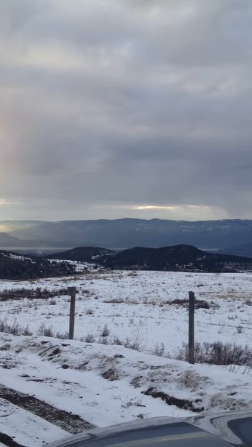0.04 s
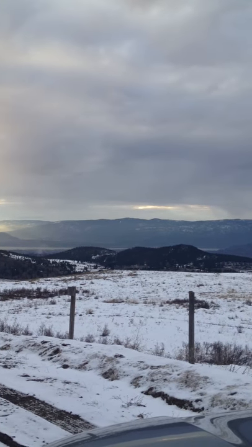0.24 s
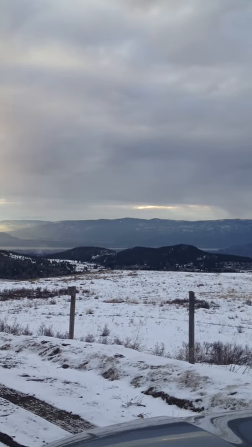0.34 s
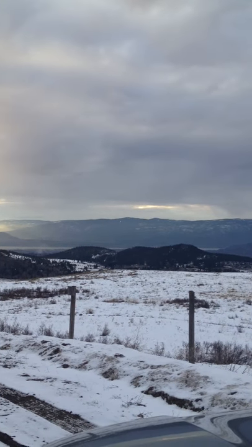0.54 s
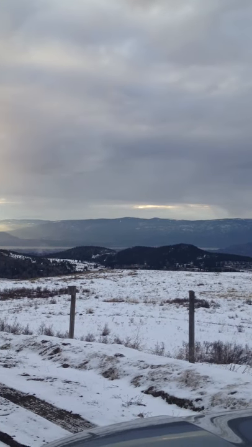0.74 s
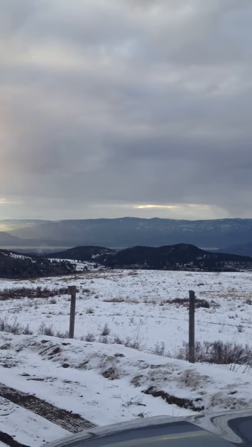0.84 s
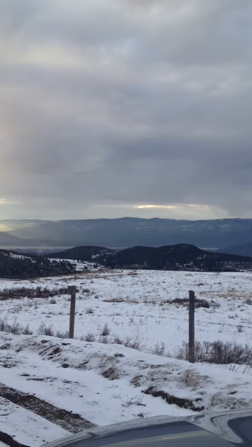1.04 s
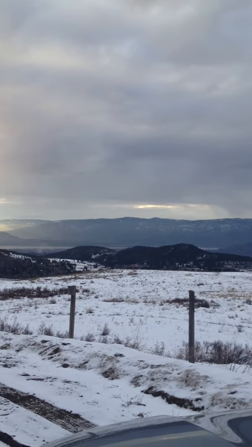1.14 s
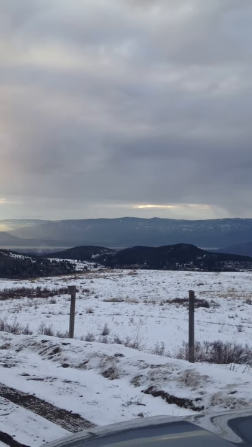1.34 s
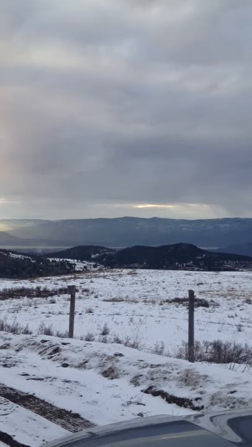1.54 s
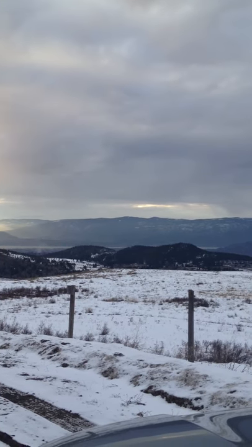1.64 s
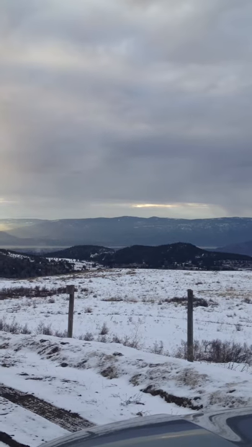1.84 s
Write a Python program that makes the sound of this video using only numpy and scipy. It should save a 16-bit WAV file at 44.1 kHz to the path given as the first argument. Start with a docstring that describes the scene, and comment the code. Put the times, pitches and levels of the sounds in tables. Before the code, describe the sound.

One coyote howl dips and rises, followed by a brief raspy bark in an open field.

```python
"""An open snowy field, where a coyote calls over a quiet hush: a raspy start, a held howl that keeps
breaking into the octave below, a swoop down and up, then one short hoarse bark. Periodic vibration
of the vocal folds gives the howl its harmonics, and period doubling adds half-pitch tones between
them. The hoarse sounds are turbulence ringing the mouth. Brush and a slope return a faint echo."""
import sys
import numpy as np
from scipy import signal
from scipy.fft import rfft, irfft
from scipy.io import wavfile
from scipy.ndimage import uniform_filter1d

SR = 44100
rng = np.random.default_rng(int(sys.argv[2]) if len(sys.argv) > 2 else 0)


def generate_wav(signal):
    """Clip the signal to [-1, 1] and save it as 16-bit WAV at the path in sys.argv[1]."""
    frames = np.transpose(np.atleast_2d(signal))
    scaled = np.clip(frames, -1, 1) * 32767
    pcm = np.round(scaled).astype(np.int16)
    wavfile.write(sys.argv[1], SR, pcm)


N = 83790
T = np.arange(N) / SR

# Response of the throat to turbulent breath. Each row: frequency in Hz, gain in dB.
BREATH_RESPONSE = [(250,-27),(450,-19.5),(560,2.5),(800,-2.5),(1000,-6.5),(1250,0.5),(1500,0),(1680,-5.5),(1900,1.5),(2150,-7.5),(2400,-19),(2800,-24),(4000,-44),(7000,-47.5)]


def from_db(db):
    """Amplitude ratio for a level in decibels."""
    return 10 ** (np.asarray(db) / 20)


def rms_one(x):
    """The signal scaled to rms 1."""
    return x / np.sqrt(np.mean(x ** 2) + 1e-20)


def envelope(rows):
    """Amplitude along a curve of level against time, silent outside it."""
    return from_db(np.interp(T, *np.transpose(rows), left=-140, right=-140))


def db_at(response, hz):
    """Gain of a frequency response in dB, interpolated over log frequency."""
    frequencies, gains_db = np.transpose(response)
    return np.interp(np.log(hz + 1), np.log(frequencies), gains_db)


def coloured_noise(spectrum):
    """White noise filtered to the shape of a spectrum; rms 1."""
    gain = from_db(db_at(spectrum, np.fft.rfftfreq(N, 1 / SR)))
    return rms_one(irfft(rfft(rng.standard_normal(N)) * gain, N))


def drift(corner_hz):
    """Smooth random fluctuation: noise through a two-pole low-pass; rms 1."""
    pole = np.exp(-2 * np.pi * corner_hz / SR)
    return rms_one(signal.lfilter([1], [1, -2 * pole, pole * pole], rng.standard_normal(2 * N))[N:])


def evened(noise):
    """Noise divided by its running rms, which removes slow swings of level."""
    return noise / np.sqrt(uniform_filter1d(noise ** 2, size=300))


def tone(phase):
    """A sinusoid of rms 1 with a random starting phase."""
    return np.sqrt(2) * np.sin(phase + 2 * np.pi * rng.random())


def hush():
    """Stationary broadband noise: still air and a faint hiss."""
    # Spectrum of the hush. Each row: frequency in Hz, relative density in dB.
    spectrum = [(30,-44),(75,-31),(100,-25),(125,-12.5),(190,-4),(300,-5),(480,-9),(600,-11.5),(830,-10),(1120,-19),(1500,-23),(2500,-24),(6000,-25.5),(8000,-27),(10200,-33.5),(12500,-26),(15200,-26)]
    return from_db(-67) * coloured_noise(spectrum)


def wash(start_db=-75, t60_s=1.3):
    """Exponential decay: a faint band of noise dies away at the opening."""
    # Spectrum of the wash. Each row: frequency in Hz, relative density in dB.
    spectrum = [(250,-27),(450,0),(900,-2.5),(1300,-17),(2500,-32)]
    return from_db(start_db - 60 * T / t60_s) * coloured_noise(spectrum)


def field_echo(call, gain_db=-21, t60_s=1.87, brush_delay_s=0.04, build_s=0.097, slope_delay_s=0.155):
    """Diffuse scattering from brush and one discrete reflection from a slope, dulled by the ground."""
    # What the snowy ground reflects. Each row: frequency in Hz, gain in dB.
    ground_response = [(450,-10),(700,1),(1000,-3.5),(1200,-8),(1380,-0.5),(1900,1),(3000,-8.5)]
    hz = np.fft.rfftfreq(N, 1 / SR)
    age_s = np.maximum(T - brush_delay_s, 0)
    scatter = rng.standard_normal(N) * (1 - np.exp(-age_s / build_s)) * from_db(-60 * age_s / t60_s)
    brush = rfft(scatter / np.sqrt(np.sum(scatter ** 2)))
    slope = from_db(-3) * np.exp(-2j * np.pi * hz * slope_delay_s)
    impulse_response = irfft((brush + slope) * from_db(gain_db + db_at(ground_response, hz)), N)
    return signal.fftconvolve(call, impulse_response)[:N]


def hoarse_voicing(after_peak_s, pitch_hz, glide_hz_per_s=2200, jitter=0.0183, fade_db_per_s=173):
    """Jitter: the folds vibrate with an unsteady period, rising in pitch and fading after the peak."""
    # Spectrum of the hoarse voice. Each entry: relative level in dB, for harmonics 1 to 4.
    harmonics_db = [0.5, 0.5, -18.5, -4.5]
    hz = (pitch_hz + glide_hz_per_s * after_peak_s) * (1 + jitter * drift(213))
    phase = 2 * np.pi * np.cumsum(hz) / SR
    harmonics = sum(from_db(db) * tone(k * phase) for k, db in enumerate(harmonics_db, start=1))
    return rms_one(harmonics) * from_db(-fade_db_per_s * after_peak_s)


def turbulence(since_peak_s, effort, mouth_hz=1203.4, opening_hz_per_s=3800, half_width_hz=137):
    """Fluttering flow excites a resonance that rises as the mouth opens; effort widens the spectrum."""
    flutter_hz = 128.7 * (1 + 0.311 * drift(56))
    flutter = rms_one(1 + 0.33 * np.sin(2 * np.pi * np.cumsum(flutter_hz) / SR))
    phase = 2 * np.pi * np.cumsum(mouth_hz + opening_hz_per_s * since_peak_s) / SR
    resonance = evened(drift(half_width_hz) * np.cos(phase) + drift(half_width_hz) * np.sin(phase))
    broadband = evened(coloured_noise(BREATH_RESPONSE)) * effort ** 0.86
    return (from_db(-2) * resonance + from_db(-3.5) * broadband) * flutter


def rasp(start_s, peak_s, level_db, rise_db, hold_s, release_s, pitch_hz, voiced_db):
    """One push of breath drives turbulence; the folds join in as the effort grows."""
    since_peak_s = np.clip(T - peak_s, start_s - peak_s, hold_s + release_s)
    swell_db = rise_db * np.minimum(since_peak_s, 0) / (peak_s - start_s)
    fall_db = 21.5 * np.maximum(T - peak_s - hold_s, 0) / release_s
    effort = from_db(swell_db - fall_db)
    throat_opening = np.clip((T - start_s) / 0.0023, 0, 1)
    voiced = from_db(voiced_db) * effort ** 1.5 * hoarse_voicing(np.maximum(since_peak_s, 0), pitch_hz)
    return from_db(level_db) * effort * throat_opening * (turbulence(since_peak_s, effort) + voiced)


def hoarse_calls(highpass_hz=248):
    """The howl's raspy start and the bark; a high-pass filter keeps low rumble out of both."""
    # Pushes of breath. Each row: start in seconds, peak in seconds, level in dB, rise in dB,
    # hold in seconds, release in seconds, pitch in Hz, relative level of the voicing in dB.
    pushes = [(0.173,.222,-52,12.5,0.016,0.015,548,-4),(1.55,1.594,-51,12.5,0.038,0.025,517.6,-2.5)]
    highpass = signal.butter(2, highpass_hz, "high", fs=SR, output="sos")
    return signal.sosfilt(highpass, sum(rasp(*push) for push in pushes))


def howl(waver=0.0031, waver_hz=59, slack_below_hz=612):
    """Source and filter: the throat shapes the folds' harmonics and their period-doubled tones."""
    # Vibration rate of the folds. Each row: time in seconds, pitch in Hz.
    pitch = [(0.236, 574.2), (0.24, 591), (0.294, 629.3), (0.392, 691), (0.436, 663), (0.556, 679.7),
             (0.628, 669.8), (0.722, 683.7), (0.744, 680), (0.764, 638.2), (0.796, 640.5), (0.814, 670.6),
             (0.828, 678.4), (0.89, 688), (0.894, 667.6), (0.922, 536.7), (0.936, 477.4), (0.964, 444.1),
             (0.968, 445.6), (1.0, 503.7), (1.018, 556.4), (1.032, 588.5), (1.06, 630.6), (1.082, 596.7),
             (1.086, 573), (1.094, 520.7), (1.1, 460), (1.118, 388.6)]
    # Envelopes of the partials. Each row: time in seconds, level in dB.
    fundamental_levels = [(.19,-101),(.235,-49.5),(.28,-48),(.38,-41.5),(.42,-43),(.455,-48),(.49,-46),(.535,-40.5),(.57,-43),(.625,-47.5),(.69,-40.5),(.74,-45),(.765,-56.5),(.795,-52),(.83,-44.5),(.888,-46.5),(.905,-59),(.98,-74.5),(1.055,-49),(1.085,-60.5),(1.12,-81)]
    octave_levels = [(.2,-63.5),(.235,-61.5),(.315,-45.5),(.333,-51.5),(.347,-67.5),(.365,-50),(.393,-51),(.41,-65.5),(.422,-49.5),(.437,-42),(.46,-46.5),(.49,-47),(.53,-53.5),(.585,-44),(.65,-45.5),(.685,-49),(.765,-40.5),(.795,-39.5),(.82,-46.5),(.89,-47),(.903,-40),(.94,-59),(.99,-61),(1.045,-39),(1.075,-39),(1.125,-77)]  # second harmonic, on the main mouth resonance
    treble_levels = [(.2,-87),(.24,-58),(.39,-48),(.485,-66),(.525,-53),(.572,-53),(.6,-76),(.69,-55.5),(.745,-67),(.765,-53),(.795,-55.5),(.815,-66.5),(.86,-56.5),(.892,-65),(.903,-50),(.92,-61),(1.01,-65),(1.045,-51.5),(1.08,-52),(1.13,-76.5)]  # harmonics 3 to 10, before the throat
    doubling_levels = [(.2,-77),(.23,-61.5),(.275,-55.5),(.32,-80),(.42,-86),(.442,-58.5),(.505,-57),(.555,-79),(.59,-60.5),(.665,-57),(.72,-66.5),(.765,-58),(.81,-61),(.88,-79)]  # half-pitch tones of strong-weak beating, before the throat
    whistle_levels = [(.22,-93),(.245,-79),(.285,-81.5),(.33,-98)]  # a thin high whistle in the rising howl
    # Responses of the throat to overtones and half-pitch tones. Each row: frequency in Hz, gain in dB.
    treble_response = [(900,2),(1350,6.5),(1560,-3.5),(1850,3),(2100,-2.5),(2320,-7.5),(2470,-25.5),(2750,-28),(3100,-38.5),(3450,-35.5),(4100,-38.5),(4700,-48.5),(5600,-45),(6150,-35),(6600,-34),(7200,-72)]
    doubling_response = [(330,-25),(850,-17),(1010,2.5),(1500,0),(1700,-0.5),(2120,1),(2340,-8.5),(2600,-46),(3200,-40)]

    hz = np.interp(T, *np.transpose(pitch)) * (1 + waver * drift(waver_hz))
    phase = 2 * np.pi * np.cumsum(hz) / SR
    fundamental, octave = envelope(fundamental_levels), envelope(octave_levels)
    treble, doubling = envelope(treble_levels), envelope(doubling_levels)
    voice = fundamental * tone(phase) + octave * tone(2 * phase)
    voice += envelope(whistle_levels) * tone(10.5 * phase)
    for k in range(3, 11):
        voice += treble * from_db(db_at(treble_response, k * hz)) * tone(k * phase)
    for k in (0.5, 1.5, 2.5, 3.5):
        voice += doubling * from_db(db_at(doubling_response, k * hz)) * tone(k * phase)
    slack_hz = np.maximum(slack_below_hz - hz, 0)  # on low notes the folds slacken and the voice roughens
    shimmer_db = 0.34 * drift(waver_hz) + 0.0151 * slack_hz * drift(110)
    breath = from_db(-39) * (fundamental + octave + treble) * coloured_noise(BREATH_RESPONSE)
    return voice * from_db(shimmer_db) + breath


def scene():
    """Superposition of the background, the coyote's direct sound and its echo, in one channel."""
    coyote = howl() + hoarse_calls()
    return (hush() + wash() + coyote + field_echo(coyote))[None]


def record(dry, cutoff_hz=15330):
    """A linear-phase low-pass filter cuts the highest treble steeply."""
    return signal.fftconvolve(dry, signal.firwin(601, cutoff_hz, fs=SR)[None], mode="same", axes=1)


dry = scene()
out = record(dry)
generate_wav(out)
```